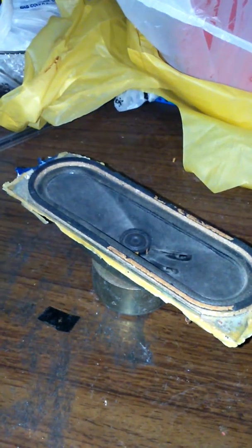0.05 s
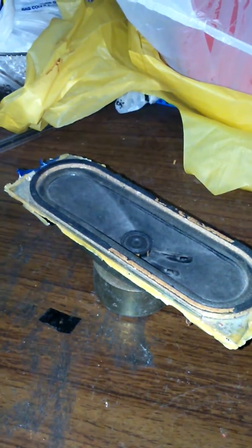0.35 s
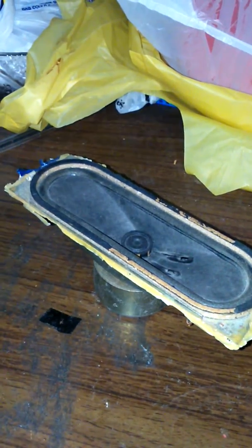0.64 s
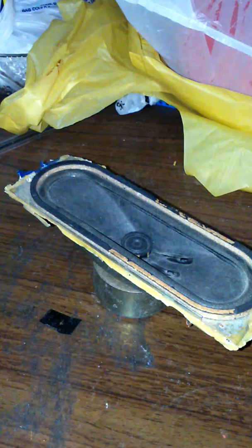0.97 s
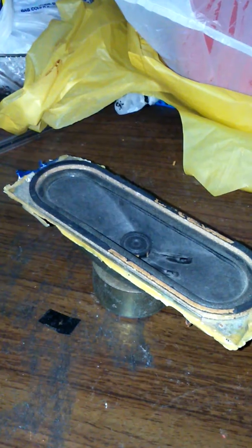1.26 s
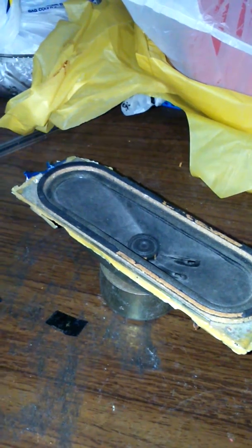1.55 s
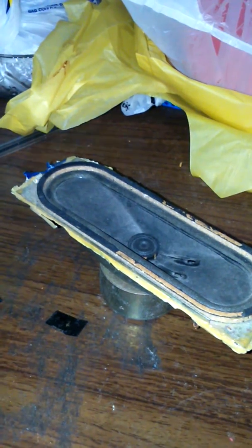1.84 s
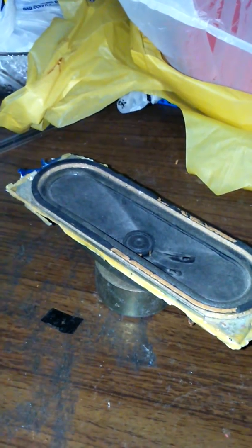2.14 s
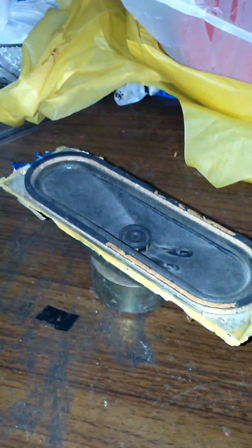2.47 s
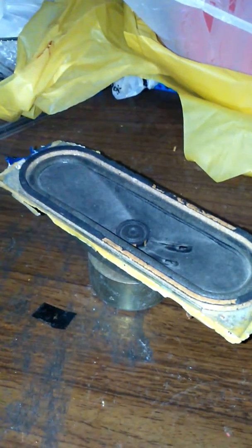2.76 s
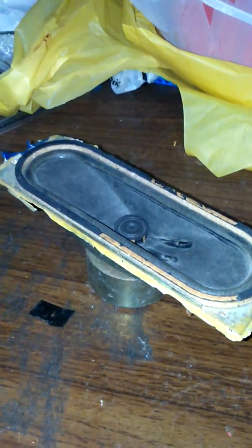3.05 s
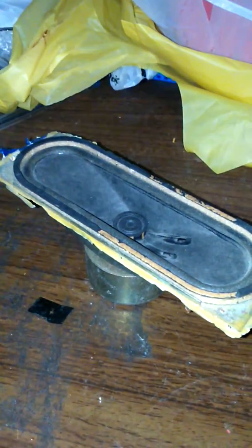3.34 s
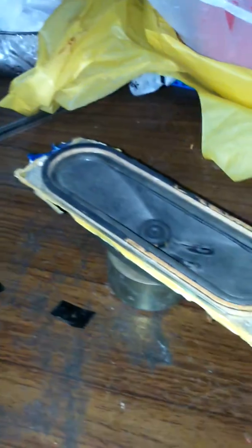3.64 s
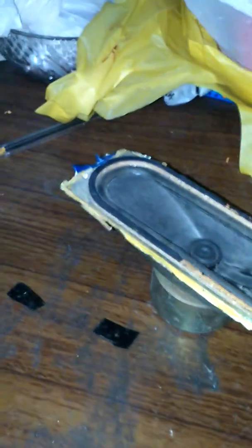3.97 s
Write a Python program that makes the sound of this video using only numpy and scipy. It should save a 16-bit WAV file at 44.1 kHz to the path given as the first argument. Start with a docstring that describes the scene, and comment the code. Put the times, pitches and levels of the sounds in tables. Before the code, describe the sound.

A bare loudspeaker clicks twice in a quiet room. At about 1.6 seconds it gives a bright, crackly double tick, and at 3.4 seconds a louder, lower pop, each ringing briefly. A faint throbbing low hum and microphone hiss run throughout, while a distant whir slowly fades. Tiny high pips come near 3 seconds, and a very soft rustle follows from 3.6 to 4 seconds.

```python
"""A quiet room, one microphone, a bare oval loudspeaker driver on a table.
The driver clicks twice, each click a short dense crackle that rings the diaphragm and the room:
first a bright double tick, then a lower pop. Under them lie a low throbbing hum, a distant wash
and a whir that slowly fade, and microphone hiss. Faint high pips and a last soft rustle come through."""
import sys
import numpy as np
from scipy import signal
from scipy.fft import rfft, irfft
from scipy.io import wavfile

SR = 44100
rng = np.random.default_rng(int(sys.argv[2]) if len(sys.argv) > 2 else 0)


def bounce(signal):
    """Save signal as a 16-bit WAV file at the path given by the first command-line argument."""
    frames = np.transpose(np.atleast_2d(signal))
    limited = np.clip(frames, -1, 1)
    pcm = np.round(limited * 32767).astype(np.int16)
    wavfile.write(sys.argv[1], SR, pcm)


N = 176400


def amp(db):
    """Decibels to gain."""
    return 10 ** (np.asarray(db) / 20)


def unit(x):
    """Scales to rms 1."""
    return x / np.sqrt(np.mean(x ** 2) + 1e-30)


def read(points, hz):
    """Reads a table on a log-frequency axis."""
    f, value = np.transpose(points)
    return np.interp(np.log(hz + 1), np.log(f + 1), value)


def level(points):
    """Gain over time from a curve in dB."""
    return amp(np.interp(np.arange(N) / SR, *np.transpose(points)))


def fade(t, t60):
    """Falls 60 dB in t60 seconds."""
    return np.exp(-np.log(1000) * t / t60)


def add(mix, s, sound):
    """Mixes a sound in at s seconds."""
    part = mix[round(s * SR):][:len(sound)]
    part += sound[:len(part)]


def coloured(x, colour):
    """Gives a signal a spectrum, at rms 1."""
    gain = amp(read(colour, np.fft.rfftfreq(len(x), 1 / SR)))
    return unit(irfft(rfft(x) * gain, len(x)))


def band(hz, width):
    """Noise in one bell-shaped band, at rms 1."""
    bell = np.exp(-.5 * ((np.fft.rfftfreq(N, 1 / SR) - hz) / width) ** 2)
    return unit(irfft(rfft(rng.standard_normal(N)) * bell, N))


# rumble in the room (frequency [Hz], level [dB])
RUMBLE_COLOUR = [(20, -56), (35, -42), (40, -2), (44, -21), (54, -3), (63, -4), (70, -3.5), (76, 1.5),
                 (81, -9.5), (88, -10.5), (100, -14.5), (120, -16.5), (150, -23.5), (220, -61)]
# its swells at the microphone (time [s], level [dB])
RUMBLE_LEVEL = [(0, -40.5), (.6, -43), (1.9, -44), (2.5, -45), (2.8, -48.5), (3.05, -44), (3.33, -51),
                (3.45, -40), (3.75, -48.5), (4, -46.5)]
HUM_HZ, HUM_DB, HUM_WANDER_HZ = 74.6, -49, 2.606


def hum():
    """A wavering low tone beats against the rumble around it."""
    hz = HUM_HZ + HUM_WANDER_HZ * band(0, width=2.23)
    tone = np.sqrt(2) * amp(HUM_DB) * np.sin(2 * np.pi * np.cumsum(hz) / SR)
    return tone + level(RUMBLE_LEVEL) * coloured(rng.standard_normal(N), RUMBLE_COLOUR)


# wash from far off (frequency [Hz], level [dB])
WASH_COLOUR = [(60, -9), (140, -4), (165, -4), (200, 2), (262, 1), (310, -7), (345, -4), (385, -12.5),
               (520, -16.5), (800, -15), (1100, -22.5), (1800, -25), (2700, -35), (5000, -50.5)]
# its fade at the microphone (time [s], level [dB])
WASH_FADE = [(0, -53.5), (.8, -56.5), (1.8, -57), (2.6, -58), (3.3, -59), (4, -61)]


def wash():
    """Dull noise in the distance, slowly fading."""
    return level(WASH_FADE) * coloured(rng.standard_normal(N), WASH_COLOUR)


# whir in the room (frequency [Hz], level [dB])
WHIR_COLOUR = [(150, -10), (345, 1.5), (420, -1.5), (540, -9.5), (800, -6), (940, 0), (1020, -2), (1090, 2),
               (1250, -6), (1800, -12), (2700, -20.5), (5000, -27.5), (15000, -50)]
# its fade at the microphone (time [s], level [dB])
WHIR_FADE = [(0, -58.5), (.7, -62), (1.3, -61.5), (2.1, -66.5), (3, -73), (4, -81)]


def whir():
    """Midrange noise that sinks under the hiss."""
    return level(WHIR_FADE) * coloured(rng.standard_normal(N), WHIR_COLOUR)


# noise floor of the microphone (frequency [Hz], level [dB])
HISS_COLOUR = [(100, -1.5), (1500, 5), (2800, 1), (4000, 0), (7000, -1), (11000, -2), (15500, -2)]
HISS_DB = -65


def hiss():
    """The microphone's own steady noise."""
    return amp(HISS_DB) * coloured(rng.standard_normal(N), HISS_COLOUR)


# pips, faint at the microphone (time [s], level [dB], frequency [Hz], width [Hz], half-length [s])
HIGH_PIPS = [(0.004, -65.5, 8050, 250, .05), (3.016, -60.5, 7000, 400, 0.0033),
             (3.103, -55, 11900, 1000, 0.0019)]


def pips():
    """High bands of noise that briefly swell and fade."""
    t = np.arange(N) / SR
    out = np.zeros(N)
    for s, db, hz, width, half_length in HIGH_PIPS:
        swell = np.exp(-((t - s) / half_length) ** 2)
        out += amp(db) * swell * band(hz, width)
    return out


# reverberation of the room (frequency [Hz], t60 [s])
ROOM_DECAY = [(850, 0.74), (2400, 0.62), (9000, 0.28), (15000, 0.21)]
ROOM_DB, ROOM_RISE_S = -9.5, 0.02


def room_tail(colour, t):
    """The room's diffuse echo of a click, the treble dying first."""
    noise = coloured(rng.standard_normal(len(t)), colour)
    hz, times, spectra = signal.stft(noise, SR, nperseg=256)
    decay = fade(times, read(ROOM_DECAY, hz)[:, None])
    _, tail = signal.istft(spectra * decay, SR, nperseg=256)
    return amp(ROOM_DB) * np.minimum(t / ROOM_RISE_S, 1) * tail[:len(t)]


GRAIN_SPREAD_DB, RING_RISE_S, LINGER_DB = 1.5, 0.0062, -20


def click(db, ring_db, colour, modes, rise_s, hold_s, t60_s):
    """A grainy crackle swells for a few milliseconds and leaves the diaphragm and the room ringing."""
    t = np.arange(SR // 2) / SR
    grains = rng.standard_normal(len(t)) * amp(GRAIN_SPREAD_DB * rng.standard_normal(len(t)))
    envelope = np.minimum(t / rise_s, 1) * fade(np.maximum(t - rise_s - hold_s, 0), t60_s)
    crackle = envelope * coloured(grains, colour) + room_tail(colour, t)
    ring = np.zeros(len(t))
    for hz, mode_db, mode_t60 in modes:
        lingering = amp(LINGER_DB) * fade(t, read(ROOM_DECAY, hz))
        tone = np.sin(2 * np.pi * (hz * t + rng.random()))
        ring += amp(mode_db) * (fade(t, mode_t60) + lingering) * tone
    return amp(db) * crackle + amp(ring_db) * np.minimum(t / RING_RISE_S, 1) * ring


# ticks from the table top (time [s], crackle level [dB], ring level [dB], tilt [dB/octave])
DRIVER_TICKS = [(1.5503, -46, -68, 0.5), (1.5631, -39.5, -42.5, -1)]
# their crackle before the tilt (frequency [Hz], level [dB])
TICK_CRACKLE = [(300, -3), (1000, -13), (2200, -5), (2650, -15.5), (3200, 4.5), (3950, -0.5), (4400, -5),
                (6400, -8), (7400, -3), (11000, -5), (13200, 0), (14200, 8), (14700, 0), (15400, -2.5)]
# diaphragm modes they ring (frequency [Hz], level [dB], t60 [s])
TICK_RING = [(2380, -0.5, 0.24), (3570, -16, 0.23), (3720, -10, .18), (3766, -8, 0.13), (4800, -9.5, 0.1),
             (13800, -15, 0.089), (14300, -4, .09)]
TILT_PIVOT_HZ = 8000


def double_tick():
    """Two crackles in quick succession ring the diaphragm's high modes."""
    out = np.zeros(N)
    for s, db, ring_db, tilt in DRIVER_TICKS:
        colour = [(hz, band_db + tilt * np.log2(hz / TILT_PIVOT_HZ)) for hz, band_db in TICK_CRACKLE]
        add(out, s, click(db, ring_db, colour, TICK_RING, rise_s=0.0049, hold_s=0.0038, t60_s=0.046))
    return out


# pop from the table top (time [s], crackle level [dB], ring level [dB])
DRIVER_POPS = [(3.378, -33, -35)]
# its crackle (frequency [Hz], level [dB])
POP_CRACKLE = [(300, -8), (750, -6), (1300, -14), (2400, -8), (3200, -3), (4400, -3.5), (5700, -7),
               (7000, -2.5), (7800, -1), (9400, -7), (10050, 11.5), (10900, -2), (12100, 2), (13300, 0.5),
               (14000, 0), (14600, -2), (15600, 0)]
# tones it rings (frequency [Hz], level [dB], t60 [s])
POP_RING = [(610, -20, 0.25), (650, -26, .23), (708, -20.5, 0.47), (760, -19, 0.14), (849, -2, 0.15),
            (869, -7.5, 0.15), (7640, -7.5, 0.11), (8200, -14, 0.16), (10000, -19, 0.14),
            (12000, -14, 0.19), (13100, -18, .15)]


def pop():
    """A longer crackle rings low beating room resonances, a main tone near 850 Hz and a few high ones."""
    out = np.zeros(N)
    for s, db, ring_db in DRIVER_POPS:
        add(out, s, click(db, ring_db, POP_CRACKLE, POP_RING, rise_s=0.0076, hold_s=0.0026, t60_s=0.063))
    return out


# rustle at the microphone (time [s], level [dB])
RUSTLE_SWELL = [(3.5, -83), (3.68, -66.5), (3.9, -65.5), (3.97, -72)]


def rustle():
    """Soft high noise that rises after the pop."""
    return level(RUSTLE_SWELL) * band(hz=8550, width=4900)


def scene():
    """The room and the driver at one microphone."""
    return (hum() + wash() + whir() + hiss() + pips() + double_tick() + pop() + rustle())[None]


BAND_LIMIT_HZ = 15750


def record(dry):
    """The recorder's steep band limit."""
    lowpass = signal.firwin(511, BAND_LIMIT_HZ, window=("kaiser", 9), fs=SR)
    return signal.oaconvolve(dry, lowpass[None], "same")


dry = scene()
out = record(dry)
bounce(out)
```